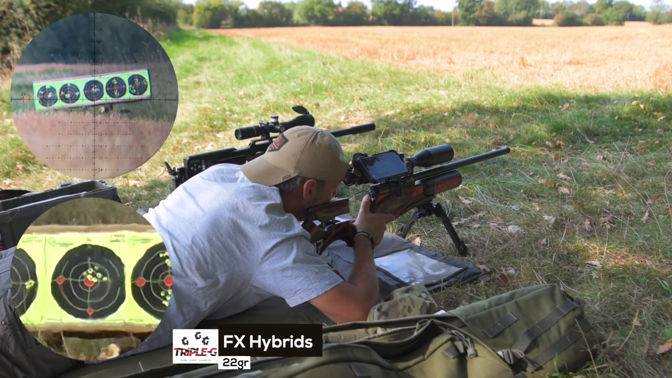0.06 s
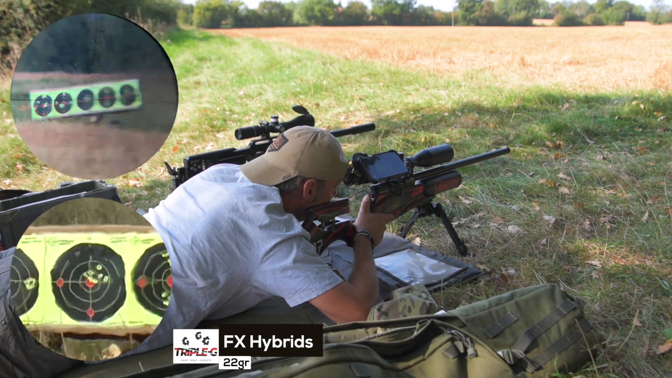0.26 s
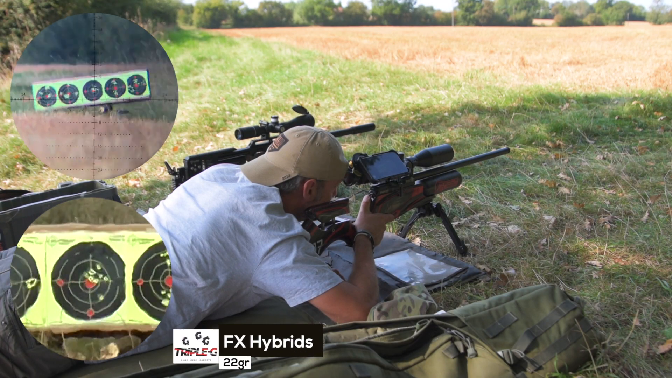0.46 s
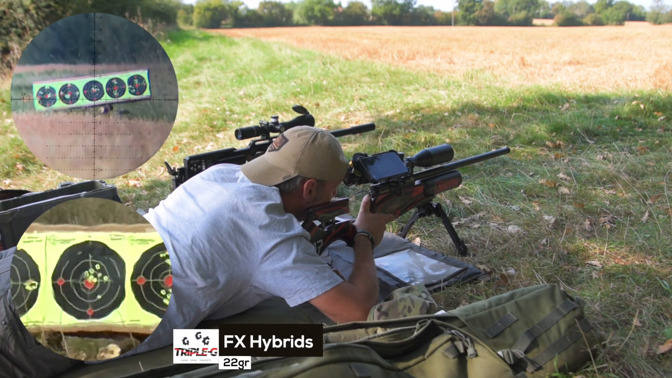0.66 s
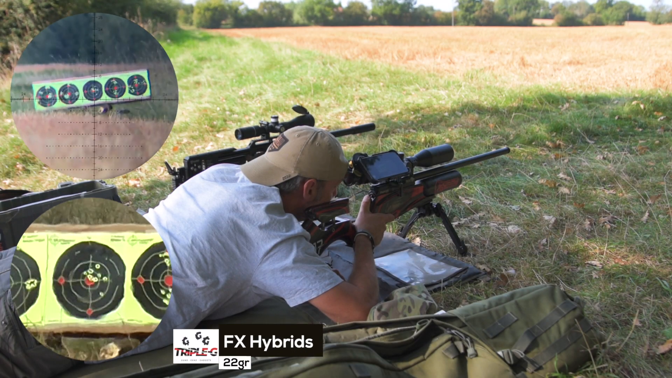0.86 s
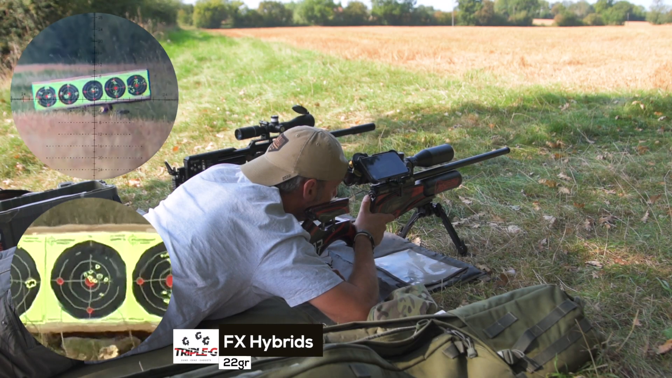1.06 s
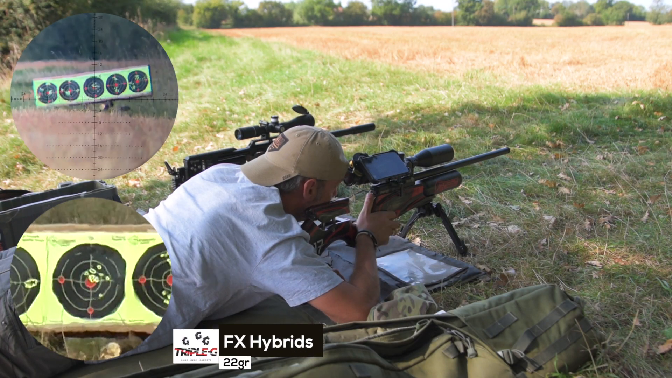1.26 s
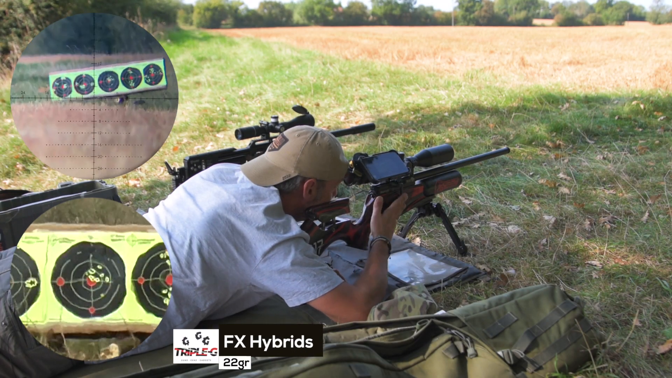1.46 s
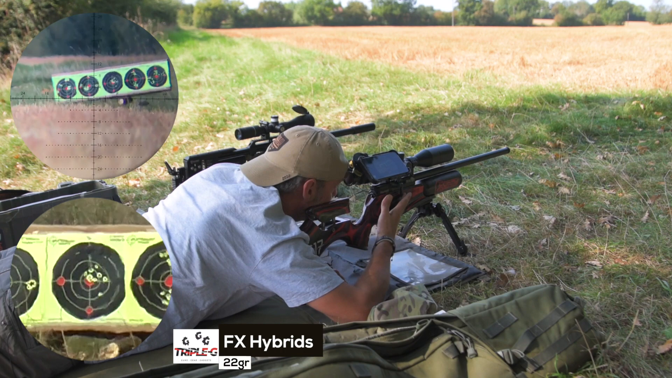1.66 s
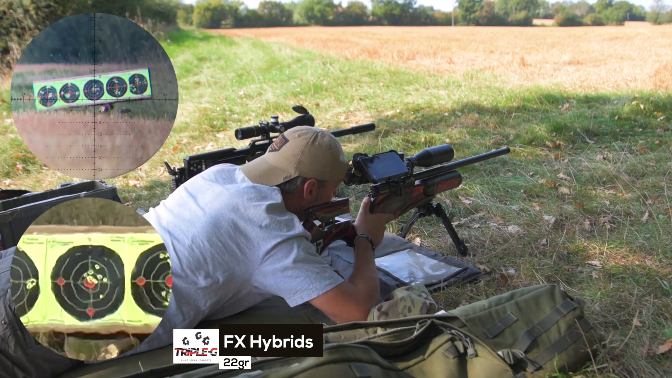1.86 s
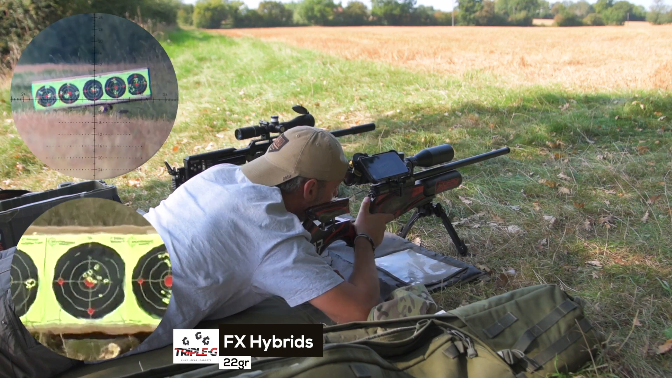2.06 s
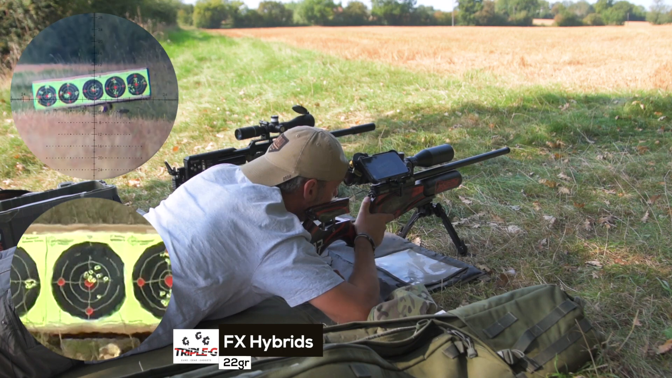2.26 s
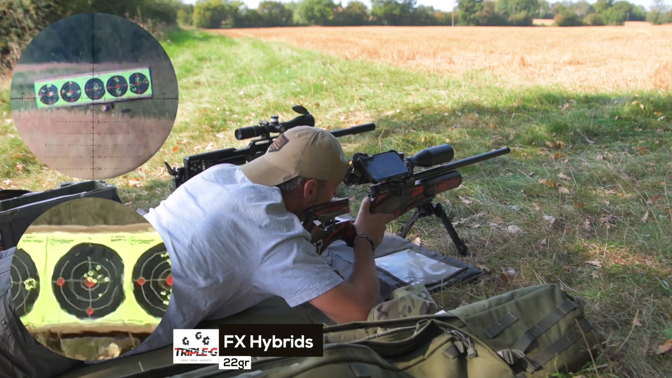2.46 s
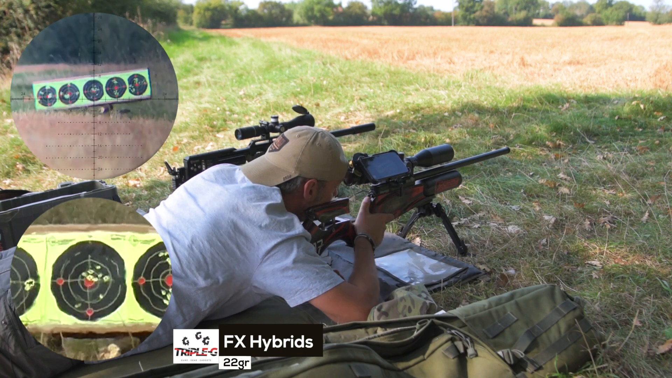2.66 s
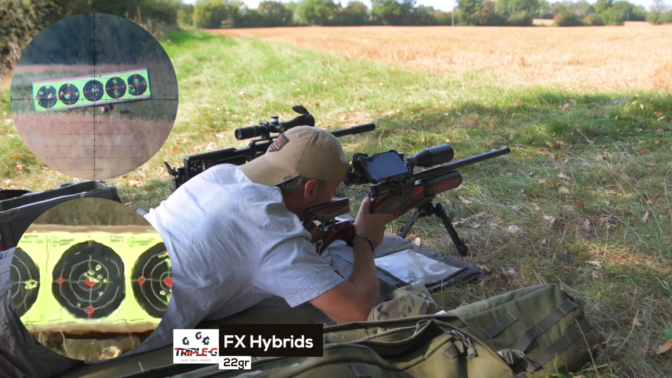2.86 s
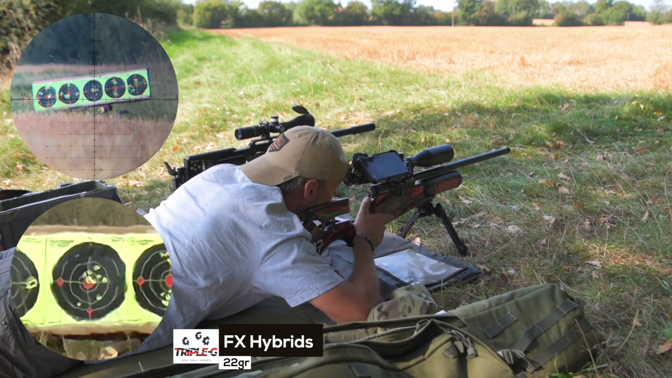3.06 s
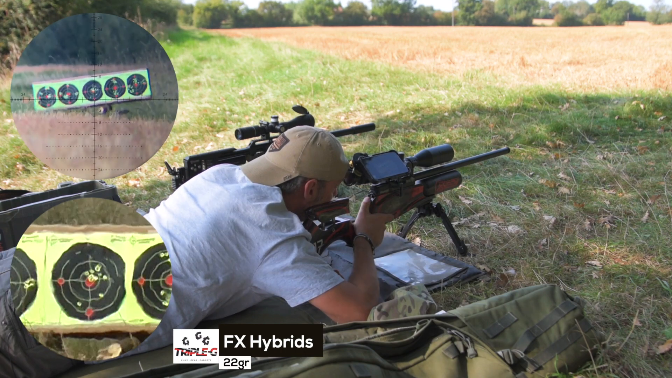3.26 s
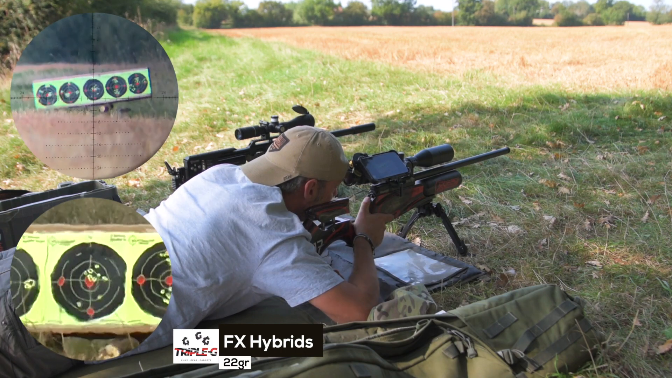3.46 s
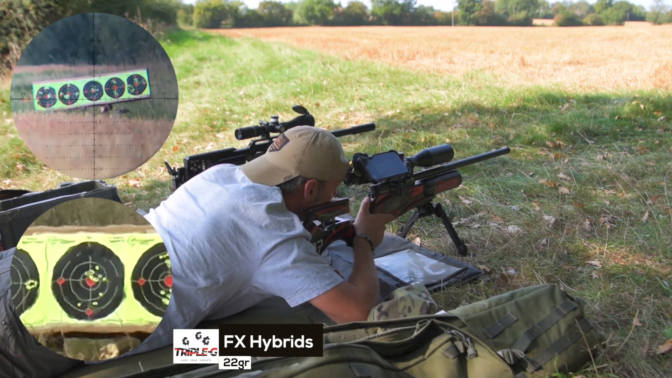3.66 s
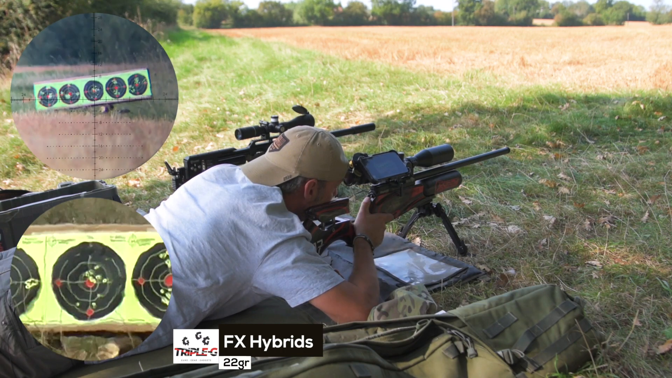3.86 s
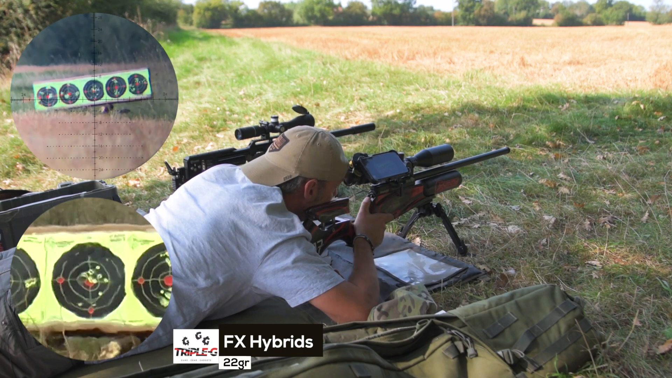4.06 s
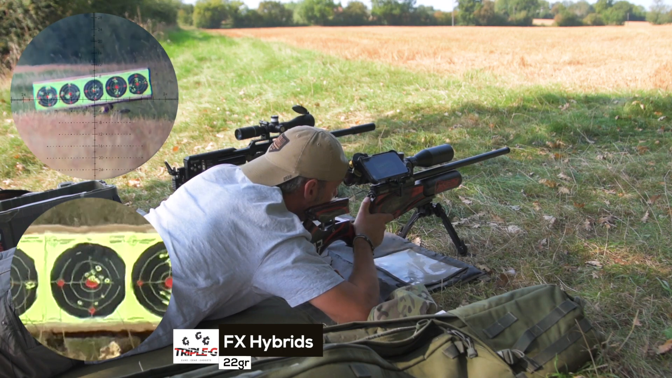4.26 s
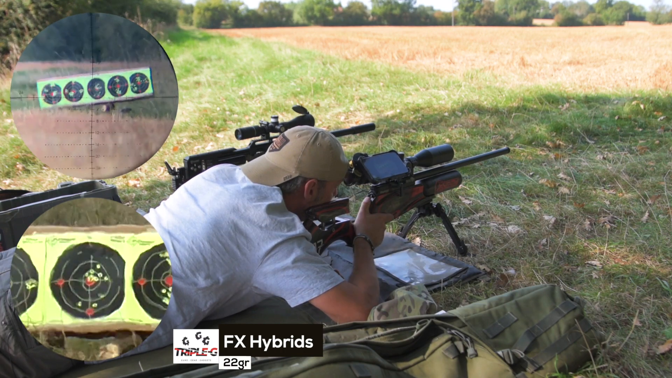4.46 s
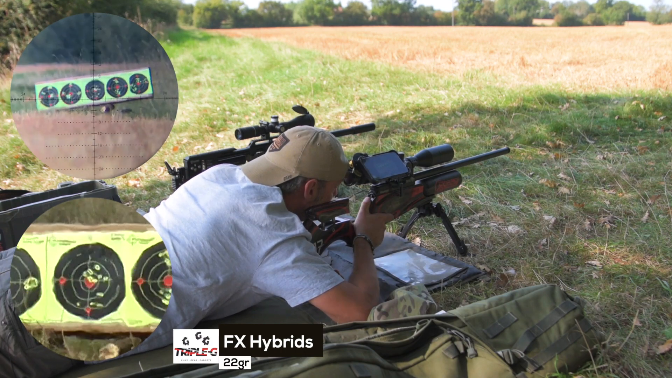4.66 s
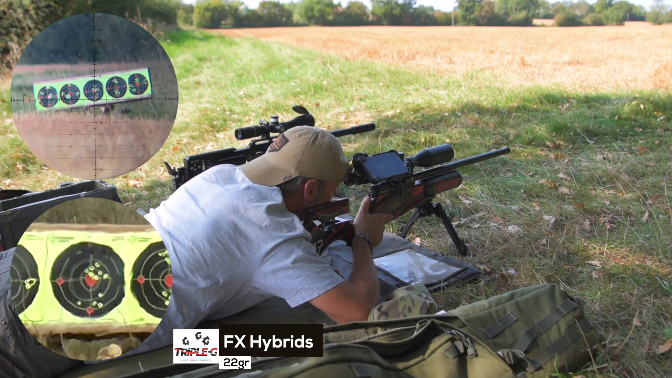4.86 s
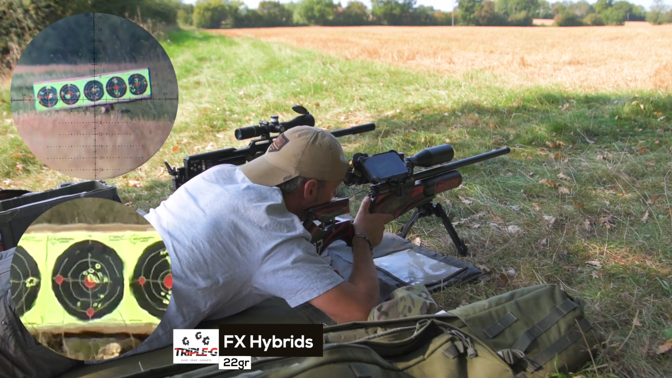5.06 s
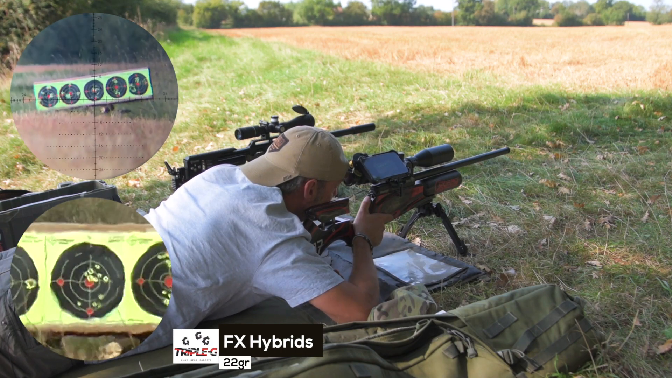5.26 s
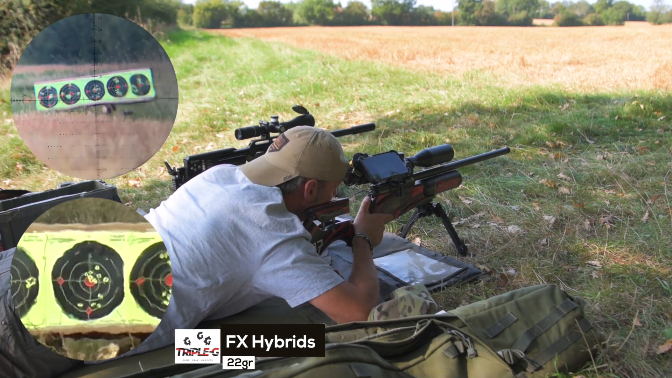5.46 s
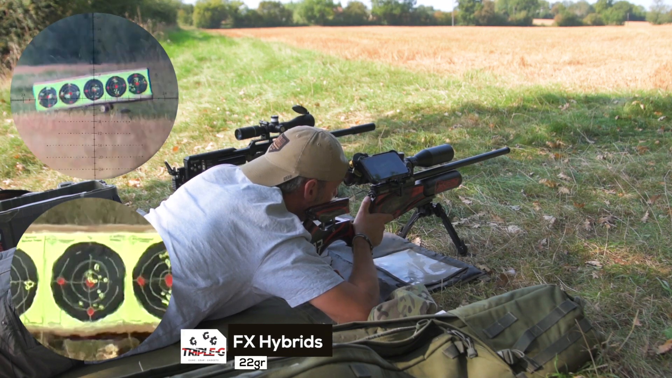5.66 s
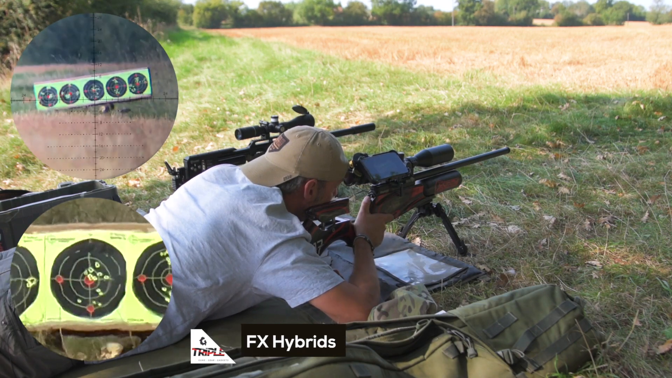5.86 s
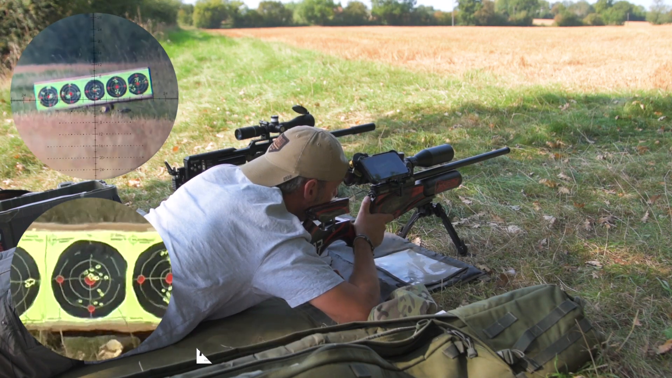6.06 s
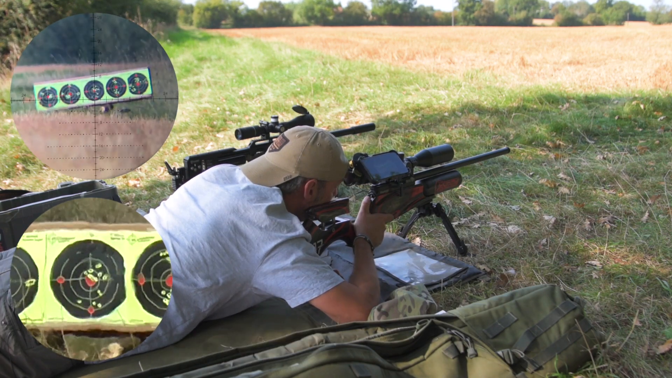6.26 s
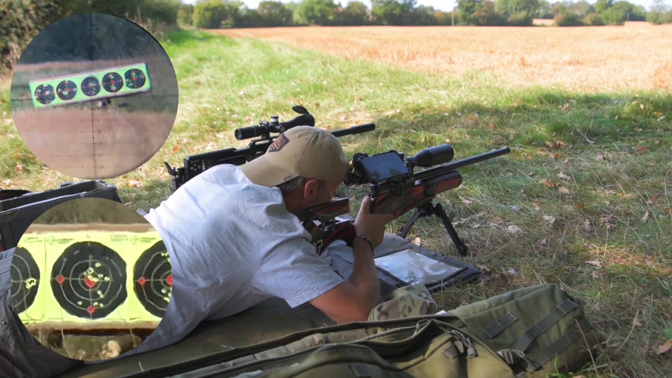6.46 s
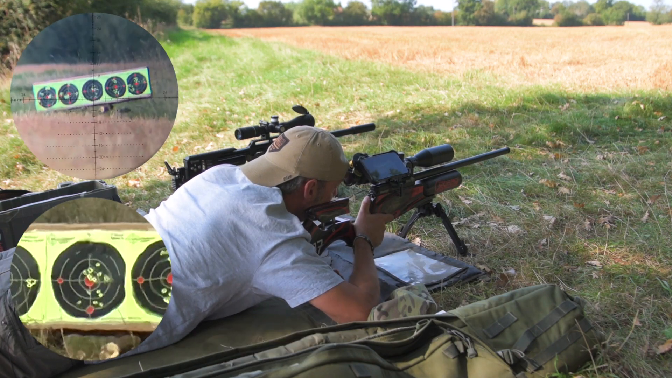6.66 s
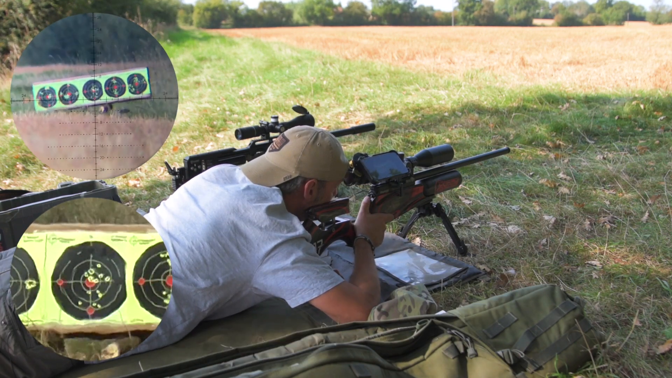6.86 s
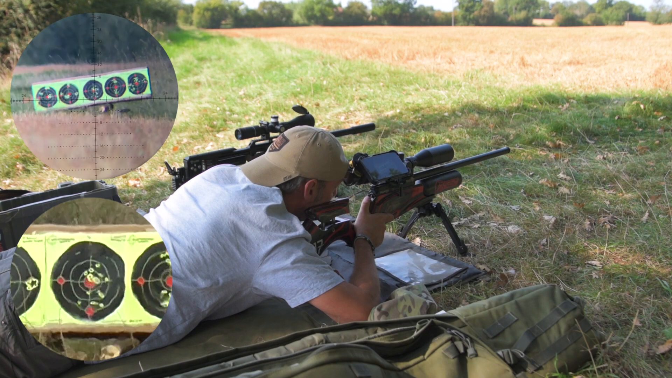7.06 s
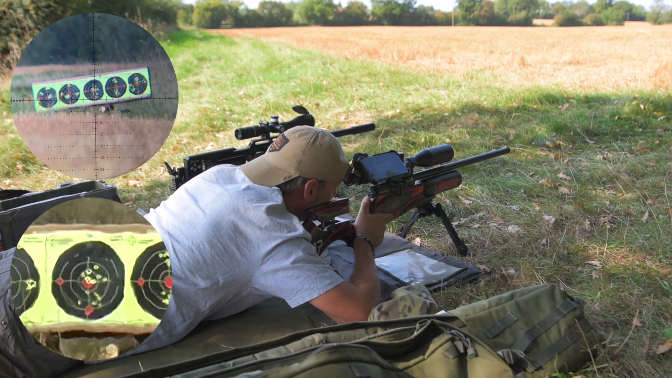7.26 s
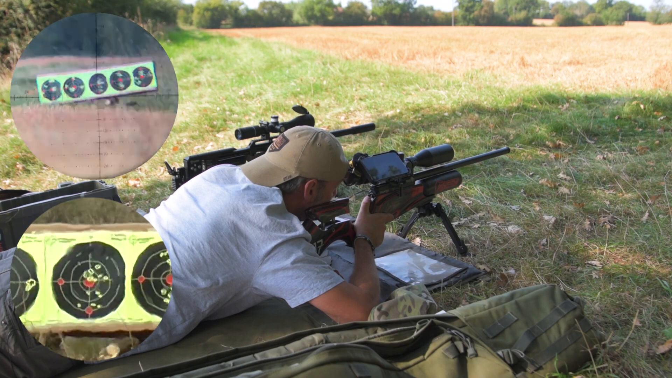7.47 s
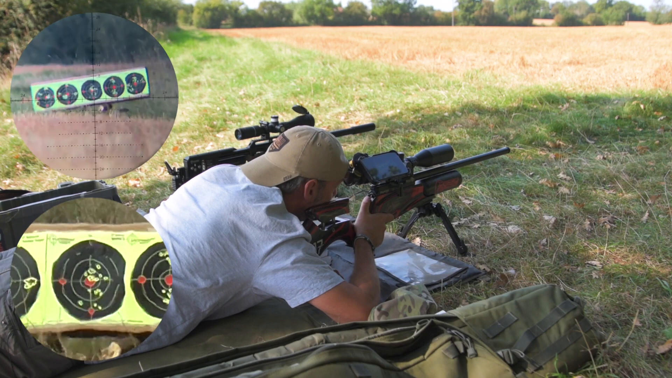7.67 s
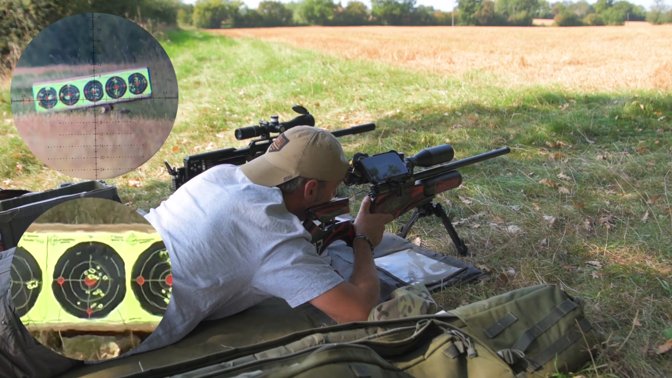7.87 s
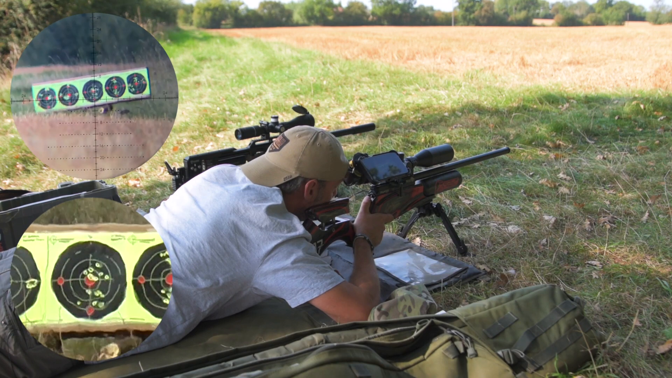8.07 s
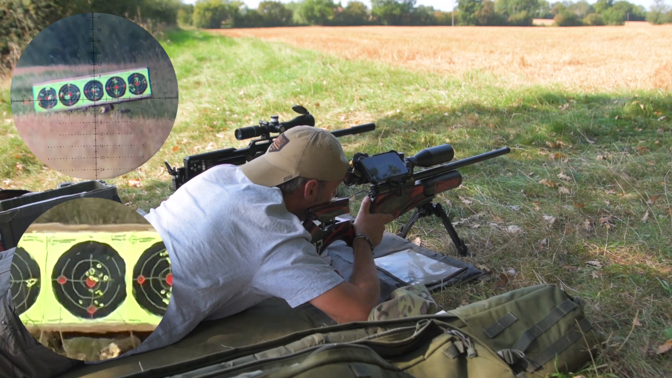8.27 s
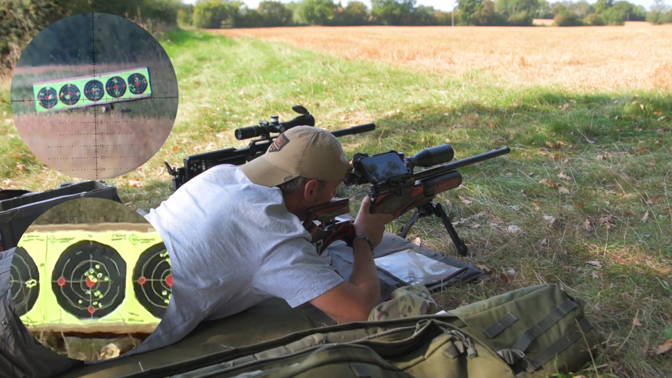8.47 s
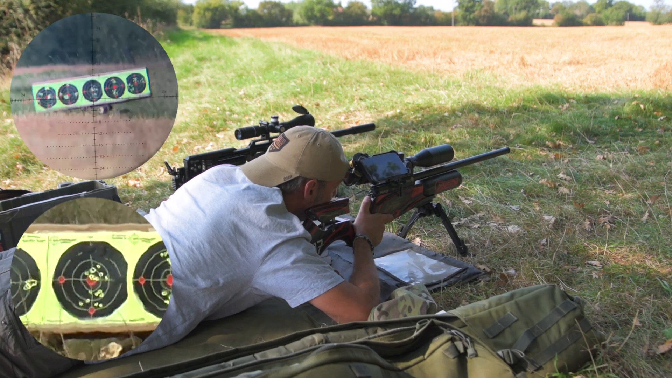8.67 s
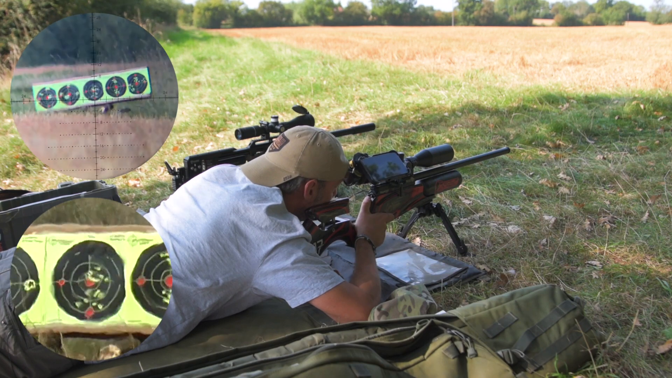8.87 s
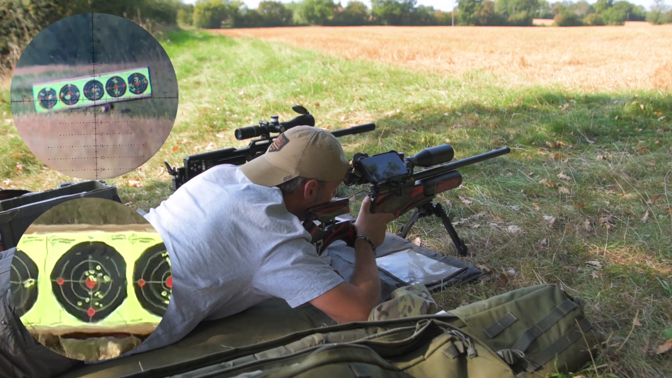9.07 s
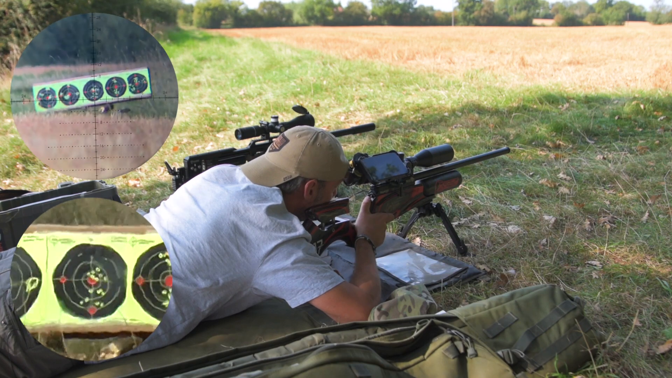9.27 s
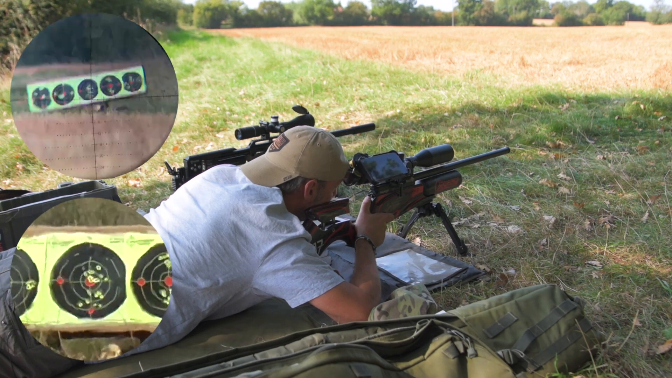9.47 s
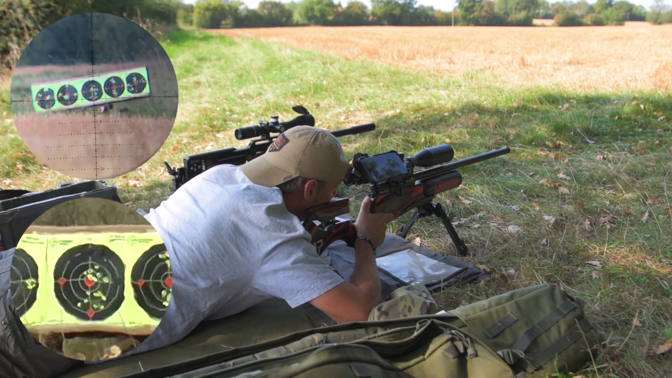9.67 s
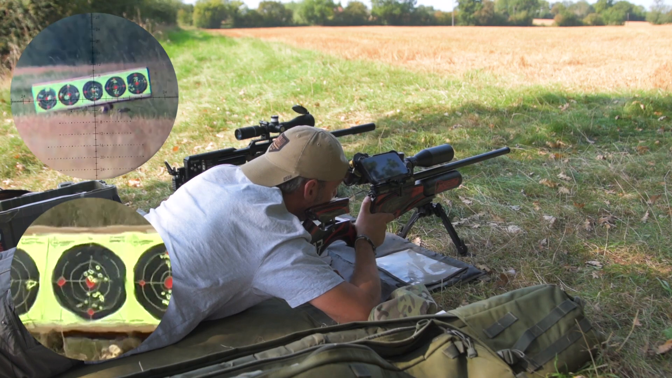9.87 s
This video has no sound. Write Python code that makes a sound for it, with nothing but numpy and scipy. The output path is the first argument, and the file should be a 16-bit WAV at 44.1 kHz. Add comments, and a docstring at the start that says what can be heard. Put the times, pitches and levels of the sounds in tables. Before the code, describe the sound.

A compressed-air rifle fires nine times about a second apart outdoors, snappy bursts of air followed by short echoes and a thin bottle ring.

```python
"""A quiet field with hedges and trees: a compressed-air rifle fires nine shots close to the microphone.
Hammer and valve ring the modes of the action; the air jet is shaped hiss, a rising whistle and fizz.
Delayed knocks and decaying noise return from trees and hedge, and the air bottle rings as sines until
each shot is cut off. Rumble, hum, hiss and handling lie beneath; the loudest peaks are clipped flat."""
import sys
import numpy as np
from scipy import signal
from scipy.fft import rfft, irfft
from scipy.io import wavfile
from scipy.ndimage import uniform_filter1d

SR = 44100
rng = np.random.default_rng(int(sys.argv[2]) if len(sys.argv) > 2 else 0)


def to_wav(sig):
    """Store sig (one row per channel, or 1-D mono) as 16-bit WAV at the path in sys.argv[1].

    Samples outside -1..1 are clipped; the rate is SR.
    """
    pcm = np.clip(np.atleast_2d(sig), -1, 1) * 32767
    pcm = np.round(pcm).astype(np.int16)
    wavfile.write(sys.argv[1], SR, pcm.T)  # frames by channels


N = 437913
LEAD_S = .003  # each shot starts this long before the hammer lands


def amp(db):
    """Decibels to gain."""
    return 10 ** (np.asarray(db) / 20)


def evened(x):
    """Scales to rms 1."""
    return x / np.sqrt(np.mean(x ** 2) + 1e-20)


def add(mix, s, sound):
    """Mixes a sound in at a time in seconds, dropping what runs past the end."""
    part = mix[round(s * SR):][:len(sound)]
    part += sound[:len(part)]


def resonate(x, hz, width):
    """Shifts the curve hz down to zero, averages over 1 / width, and shifts back: a band of gain 1."""
    turn = np.exp(2j * np.pi * np.cumsum(hz * np.ones(len(x))) / SR)
    r = np.exp(-np.pi * width / SR)
    return 2 * (turn * signal.lfilter([1 - r], [1, -r], x / turn)).real


def narrow_band(x, hz, width):
    """Two equal resonances in a row, scaled to rms 1."""
    return evened(resonate(resonate(x, hz, width), hz, width))


def noise(size, level_db):
    """Random short-time spectra; level_db(hz, t) gives the magnitude."""
    hz = np.fft.rfftfreq(256, 1 / SR)[:, None]
    t = np.arange(size // 64 + 5) * 64 / SR
    real, imag = rng.standard_normal((len(t), 129, 2)).T
    spectra = (real + 1j * imag) * amp(level_db(hz, t)) / 16
    return signal.istft(spectra, nperseg=256, noverlap=192)[1][:size]


def on_log(points, hz, column=1):
    """Reads a table column on a log-frequency axis."""
    points = np.transpose(points)
    return np.interp(np.log(hz + 1), np.log(points[0] + 1), points[column])


def puff(ms, at_ms, peak_db, rise, fall):
    """A gain that climbs to its peak and falls away, straight in dB; slopes in dB per ms."""
    return amp(peak_db - rise * np.maximum(at_ms - ms, 0) - fall * np.maximum(ms - at_ms, 0))


def unsteady_tone(hz, width, flicker_db):
    """A tone whose pitch wavers on the scale of width and whose level flickers."""
    wander, flicker = (evened(uniform_filter1d(v, 30)) for v in rng.standard_normal((2, len(hz))))
    phase = 2 * np.pi * np.cumsum(hz + .5 * width * wander) / SR
    return amp(flicker_db * flicker) * np.sqrt(2) * np.sin(phase)


# colour of the wash over the open field: f/Hz, relative level/dB
WASH_COLOUR = [(12, -33.5), (20, -4), (70, -1.5), (334, -10), (394, -10.5), (582, -15), (728, -16.5),
               (3100, -21.5), (14300, -23), (15600, -23)]
WASH_DB = -66.5


def wash():
    """Steady noise from the open field, weighted towards the bass."""
    colour = amp(on_log(WASH_COLOUR, np.fft.rfftfreq(N, 1 / SR)))
    return amp(WASH_DB) * evened(irfft(rfft(rng.standard_normal(N)) * colour, N))


# distant traffic or wind, rising and sinking: t/s, level/dB
RUMBLE_LEVEL = [(0.0, -68), (0.55, -77), (1.52, -63.5), (1.91, -77.5), (2.21, -69.5), (2.65, -79.5),
                (3.29, -68.5), (3.68, -77), (4.42, -69), (4.78, -77.5), (5.56, -73.5), (5.83, -77.5),
                (6.22, -70), (7.11, -74), (7.33, -68), (7.88, -74), (8.33, -66.5), (9.93, -70.5)]


def rumble():
    """Low band noise whose level follows a slow, lumpy curve."""
    level_db = np.interp(np.arange(N) / SR, *np.transpose(RUMBLE_LEVEL))
    return amp(level_db) * narrow_band(rng.standard_normal(N), 77, 45)


# spells of a low hum: start t/s, end t/s, level/dB
HUM_SPELLS = [(.05, .68, -70.5), (1.408, 1.75, -68.5)]
HUM_FADE_DB_PER_S = 68.5


def hum():
    """Narrow band noise that fades in before each spell and out after it."""
    t = np.arange(N) / SR
    level = 0
    for start, end, db in HUM_SPELLS:
        outside_s = np.maximum(np.maximum(start - t, t - end), 0)
        level = level + amp(db - HUM_FADE_DB_PER_S * outside_s)
    return level * narrow_band(rng.standard_normal(N), 167, 20)


# the shooter shifts and handles the rifle:
# t/s, level before the swell/dB, f/Hz, width of each filter pass/Hz, length/s
RUSTLES = [(0.775, -70.5, 4000, 500, 0.064), (0.767, -63.5, 5500, 5300, 0.023),
           (1.226, -61, 730, 660, 0.02), (1.223, -60.5, 4600, 2500, 0.011), (1.224, -64, 2110, 600, 0.026),
           (1.4, -57.5, 1260, 900, 0.0124), (1.272, -64.5, 1600, 1100, 0.063), (1.47, -77, 1400, 500, 0.39),
           (1.659, -69, 1195, 1204, 0.021), (1.713, -72, 1200, 1300, 0.063)]


def handling():
    """Cloth and fingers: short grainy noises in one band each, swelling and dying away."""
    out = np.zeros(N)
    for s, db, hz, width, length in RUSTLES:
        u = np.linspace(0, 1, round(length * SR))
        grain_db = 3.5 * np.minimum(rng.exponential(1, len(u)), 4)
        grains = rng.standard_normal(len(u)) * amp(grain_db)
        add(out, s, amp(db) * narrow_band(grains, hz, width) * 3 * np.sqrt(u) * (1 - u))
    return out


# finger on the stock: t/s, relative level/dB, f rung best/Hz, loss an octave away/dB, rise/s, longest t60/s
TAPS = [(1.4922, -32, 1150, 26, 0.0006, 0.027), (1.493, -28.5, 330, 15.5, 0.00048, 0.029)]


def finger_taps():
    """A finger taps the stock, ringing modes that the hand damps."""
    out = np.zeros(N)
    for s, *blow in TAPS:
        add(out, s, knock(*blow))
    return out


# kinds of far trunk: relative level/dB, f returned best/Hz, loss an octave away/dB
TRUNKS = [(-3, 1100, 15), (-1, 1600, 15), (-4.5, 1600, 12), (-13.5, 3350, 14.5), (-13.5, 8300, 12),
          (-14, 8700, 10)]


def trees(size, best_hz, second_hz):
    """Each far trunk returns a blurred copy of a knock; a few are stronger, and two bands carry best."""
    t = np.arange(size) / SR
    chance, side, strength = rng.random((size, len(TRUNKS) + 2, 3)).T
    present = chance < 600 / SR  # about 600 returns a second of each kind
    returns = present * np.sign(side - .5) * amp(3 * np.minimum(-np.log(1 - strength), 4))
    echoes = 0
    for train, (db, hz, falloff_db) in zip(returns, TRUNKS):
        copy = evened(knock(0, hz, falloff_db, .001, 0.035, spread_db=3.5))
        echoes = echoes + amp(db) * signal.oaconvolve(train, copy)[:size]
    bands = amp(-3.5) * narrow_band(returns[-1], best_hz, 190)
    bands += amp(-6.5) * narrow_band(returns[-2], second_hz, 190)
    decay = amp(-60 * t / .55) + amp(-19.0 - 60 * t / 3.3)  # quick, then lingering
    return evened(evened(echoes) + bands) * decay


# scatter from the hedge, before each shot's own gain:
# f/Hz, early level/dB, early t60/s, late level/dB, late t60/s
HEDGE_SCATTER = [(100, -45.5, 0.17, -62.5, .5), (400, -46, 0.73, -62.5, .5), (696, -48, 0.4, -57, 0.73),
                 (1200, -46.5, 0.49, -52.5, .6), (2200, -41.5, 0.17, -50.5, 0.42),
                 (2800, -43.5, .2, -52, 0.9), (4370, -41.5, 0.17, -44.5, .55),
                 (8000, -36.5, 0.13, -42.5, .45), (10900, -41, 0.083, -49, .4),
                 (15400, -44.5, .14, -55.5, 0.39), (15800, -76.5, .15, -85, .3)]


def hedge(size):
    """The bang swells back from the nearest leaves in lumps, each band dying at its own two rates."""
    def level_db(hz, t):
        first_db, first_t60, later_db, later_t60 = (on_log(HEDGE_SCATTER, hz, column=k) for k in (1, 2, 3, 4))
        both = amp(first_db - 60 * t / first_t60) + amp(later_db - 60 * t / later_t60)
        lumps = rng.standard_normal((len(t), len(hz))).T
        lumps = evened(uniform_filter1d(uniform_filter1d(lumps, 7, 0), 5, 1))
        # each bang has its own colour
        bands = evened(uniform_filter1d(rng.standard_normal(hz.shape), size=3, axis=0))
        # clumps of leaves make the whole level flutter
        flutter = evened(uniform_filter1d(rng.standard_normal(len(t)), size=6))
        return 20 * np.log10(both) + 1.6 * lumps + 2.4 * bands + 1.5 * flutter
    t = np.arange(size) / SR
    return noise(size, level_db) * (1 - np.exp(-(t / 0.0087) ** 2))


def echo(db, best_hz):
    """A knock that has travelled: blunt, short, stripped of bass and treble."""
    return resonate(knock(db, best_hz, 9.9, .001, hold_t60=0.079, spread_db=2.0), best_hz, 700)


# echoes after every shot, in the colour of the trees: t after the hammer lands/s, level before filtering/dB
SLAPS = [(.047, -37.5), (.0735, -32), (.132, -33.5), (0.157, -39), (0.311, -51.5)]


def single_echoes(size, trees_hz, far_db):
    """Separate reflections, among them a strong low one and a late one that varies from shot to shot."""
    out = np.zeros(size)
    for after, db in SLAPS + [(.248, far_db)]:
        add(out, LEAD_S + after, echo(db, trees_hz))
    add(out, LEAD_S + .0728, echo(-22.5, 1082))
    return out


# modes of the air bottle, before each shot's own gain: f/Hz, level/dB, t60/s
BOTTLE_MODES = [(888.4, -51.5, 1.8), (1170, -67, 0.95), (1450, -64, 0.23), (1860, -65, .5),
                (2270, -64, 0.59), (3390, -66, .4)]


def bottle(size, bottle_db):
    """The air bottle keeps ringing: soft-starting sines with random phase, each fading at its own rate."""
    t = np.arange(size) / SR
    out = np.zeros(size)
    for hz, db, t60 in BOTTLE_MODES:
        tone = np.sin(2 * np.pi * (hz * t + rng.random()))
        out += amp(db + bottle_db - 60 * t / t60) * tone * (1 - np.exp(-t / 0.022))
    return out


def low_push(size, push_db, push_hz):
    """Recoil and displaced air: a thump that falls from 1.24 to 0.6 times push_hz."""
    t = np.arange(size) / SR
    cycles = np.cumsum(push_hz * (.6 + 0.64 * np.exp(-t / 0.032))) / SR
    swell = (t / 0.014 * np.exp(1 - t / 0.011)) ** 5.7
    return amp(push_db) * swell * np.sin(2 * np.pi * cycles)


# moments of the air jet, ms after the hammer lands
STRIKE_MS, OPEN_MS, EMPTY_MS, SHUT_MS = 0.14, 3.8, 11.1, 20.8
# colour of the escaping air: f/Hz, relative level/dB
HISS_COLOUR = [(150, -32.5), (400, -7), (1200, -9), (3500, -14), (7200, -10.5), (11000, -13), (15300, -16),
               (16000, -31.5)]
# relative peak/dB, rise/dB per ms, fall/dB per ms: at the strike, from the open valve, after it shuts
CRACK, BLAST, SIGH = (-6.5, 30, 9), (-11, 5, 0.98), (-44.5, 3, 0.14)


def hiss(ms):
    """Turbulent air: coloured noise in a crack, a blast that the shutting valve cuts short, and a sigh."""
    gain = puff(ms, STRIKE_MS, *CRACK) + puff(ms, SHUT_MS, *SIGH)
    gain += puff(ms, OPEN_MS, *BLAST) * puff(ms, SHUT_MS, 0, 0, 2)
    return gain * evened(noise(len(ms), lambda f, t: on_log(HISS_COLOUR, f) + 0 * t))


WHISTLE_HZ, SLIDE_HZ_PER_MS, SLIDE_FROM_MS = (3445, 15640), 1211, 1.8
WHISTLE_DB, WHISTLE_SWELL_DB, WHISTLE_SWELL_MS, WHISTLE_STOP_DB_PER_MS = -3, 40, 3.8, 15.5


def whistle(ms):
    """A muzzle whistle that swells and slides up as the barrel empties, then stops."""
    hz = np.clip(WHISTLE_HZ[0] + SLIDE_HZ_PER_MS * (ms - SLIDE_FROM_MS), *WHISTLE_HZ)
    gain = amp(WHISTLE_DB - WHISTLE_SWELL_DB * np.exp(-ms / WHISTLE_SWELL_MS))
    gain *= puff(ms, EMPTY_MS, 0, 0, WHISTLE_STOP_DB_PER_MS)
    return gain * unsteady_tone(hz, 900 + .35 * (WHISTLE_HZ[1] - hz), 2.8)  # rough while low


# relative peak/dB, rise/dB per ms, fall/dB per ms
FIZZ_STRIKE, FIZZ_BLAST = (-23.5, 50, .4), (-9, 5.1, 0.32)
FIZZ_RING, FIZZ_TAIL = (-19, 8, 1), (-44, 9, .95)
FIZZ_LAG_MS, FIZZ_STOP_DB_PER_MS = 1.3, 9
# pitch at strike, emptied; width at strike, emptying, ringing
FIZZ_HZ, FIZZ_WIDTH_HZ = (12900, 14510), (3000, 1600, 300)


def fizz(ms):
    """A high, rough fizz that narrows to a clear ring when the barrel is empty."""
    blowing = puff(ms, STRIKE_MS, *FIZZ_STRIKE) + puff(ms, OPEN_MS + FIZZ_LAG_MS, *FIZZ_BLAST)
    blowing *= puff(ms, EMPTY_MS, 0, 0, FIZZ_STOP_DB_PER_MS)
    ringing = puff(ms, EMPTY_MS + FIZZ_LAG_MS, *FIZZ_RING) * puff(ms, SHUT_MS, 0, 0, FIZZ_STOP_DB_PER_MS)
    tail = puff(ms, SHUT_MS + FIZZ_LAG_MS, *FIZZ_TAIL)
    hz = np.interp(ms, [STRIKE_MS, EMPTY_MS], FIZZ_HZ)
    width = np.interp(ms, [STRIKE_MS, EMPTY_MS, EMPTY_MS + FIZZ_LAG_MS], FIZZ_WIDTH_HZ)
    return (blowing + ringing + tail) * unsteady_tone(hz, width, 3.5)


def jet(hiss_db, whistle_db):
    """Air from the muzzle: hiss, whistle and fizz, almost sealed in until the hammer lands."""
    ms = np.arange(-LEAD_S, .05, 1 / SR) * 1000
    air = amp(hiss_db) * hiss(ms) + amp(whistle_db) * (whistle(ms) + fizz(ms))
    return air * puff(ms, 0, 0, 30, 0)


# modes of action and stock: f/Hz, relative level/dB, t60 before further damping/s
ACTION_MODES = [(159, -8, 0.3), (220, -12, 0.035), (385, -11, 0.031), (494, -2.5, 0.029), (668, -1, 0.03),
                (817, -8, 0.024), (1117, -4, 0.047), (1205, -7.5, .04), (1448, -3, 0.035),
                (1610, -3.5, 0.02), (1883, -1.5, 0.021), (2027, -4.5, 0.039), (2237, -2.5, 0.033),
                (2160, -8, 0.012), (2730, -10, 0.026), (3264, -7, 0.02), (3580, 1.5, 0.018),
                (4060, -4.5, 0.022), (4630, -3.5, 0.037), (5940, -1, 0.017), (6870, -3.5, .02),
                (9430, -6.5, 0.038), (10150, -6.5, 0.0052), (12800, -8, 0.0086)]


def knock(db, best_hz, falloff_db, rise, hold_t60=0.1, spread_db=4.0):
    """One blow rings all modes of the action, most those near best_hz, never twice quite alike."""
    hz, mode_db, t60 = np.transpose(ACTION_MODES)[:, :, None]
    t = np.arange(2200) / SR
    chance = rng.standard_normal((len(ACTION_MODES), 2, 1))
    level_db = mode_db - falloff_db * abs(np.log2(hz / best_hz)) + spread_db * chance[:, 0] - 60 * t / t60
    detuned_hz = hz * (1 + 0.01 * chance[:, 1])
    ring = (amp(level_db) * np.sin(2 * np.pi * detuned_hz * t)).sum(0)
    return amp(db - 60 * t / hold_t60) * ring * (1 - np.exp(-(t / rise) ** 2))


# blows in every shot, before each shot's own gain:
# t after the hammer lands/s, relative level/dB, f rung best/Hz, loss an octave away/dB, rise/s
BLOWS = [(-.003, -38, 699.8, 7, .001), (-.0021, -23, 901, 8.5, .0008), (-.0001, -13, 1707, 5, .00005),
         (.0006, -12.5, 2967, 3.5, 0.000088), (.003, -13, 2317, 3, .00005),
         (.0042, -15, 4686, 0.5, 0.00008), (.0062, -21, 1000, 7.5, .0003), (.0085, -18.5, 700, 4, .0004),
         (.013, -28.5, 997.2, 4, .0005), (.0203, -21, 4521, 3, .0002), (.0205, -15.5, 1383, 5.5, .0012),
         (0.03, -26, 200.1, 8.5, .003)]


def hammer_and_valve(size, action_db):
    """Hammer and valve strike the action in a quick run of knocks."""
    out = np.zeros(size)
    for after, db, *colour in BLOWS:
        add(out, LEAD_S + after, knock(db + action_db, *colour))
    return out


def shot(s, action_db, hiss_db, whistle_db, push_db, push_hz, hedge_db, trees_hz, second_hz, far_db,
         bottle_db, end_s):
    """Start time and sound of one shot with its returns, faded out over the last 2 ms."""
    size = round((end_s - s) * SR)
    out = single_echoes(size, trees_hz, far_db)
    scatter = amp(hedge_db) * hedge(size) + amp(-44.5) * trees(size, trees_hz, second_hz)
    add(out, .041, scatter)
    out += bottle(size, bottle_db) + low_push(size, push_db, push_hz)
    add(out, 0, jet(hiss_db, whistle_db))
    out += hammer_and_valve(size, action_db)
    t = np.arange(size) / SR
    return s - LEAD_S, out * np.minimum((t[-1] - t) / .002, 1)


# the nine shots, hammer at t/s; gains of action, air hiss, whistle with fizz, low push: level/dB each;
# push f/Hz; hedge gain level/dB; f the trees return best/Hz, second best f/Hz;
# far echo level before filtering/dB; bottle gain level/dB; t/s that with t sets the length
SHOTS = [(0.1827, 0, 2.5, 0.5, -15.5, 90.3, 13, 1789, 2340, -39, 0, 1.77),
         (2.2585, 1, 1.5, -1.5, -12, 90, 12, 1790, 1442, -32, 1, 2.835),
         (3.2536, 2, 2, 2, -11.5, 155, 13, 2188, 3286, -38.5, 3, 3.835),
         (4.3110, 0, 3, 2, -9, 130.8, 12.5, 1860, 2230, -38, 2.5, 4.903),
         (5.3920, -0.5, 2, 2, -9.5, 137.8, 13.5, 2202, 1179, -41.5, 2.5, 5.869),
         (6.3368, -0.5, 2.5, -1, -12.5, 80, 11, 2185, 1110, -42, 1.5, 6.904),
         (7.324, 0.5, 1, -1.5, -7.5, 72.5, 11, 1837, 1440, -42, 2, 7.905),
         (8.3827, 0.5, 1, 2, -6, 75, 11.5, 1860, 2310, -42, 3.5, 8.91),
         (9.3288, 1, 2, 2, -8, 112.4, 11.5, 2195, 1420, -47.5, 2, 9.99)]


def scene():
    """Shots and their echoes over the quiet field."""
    mix = wash() + rumble() + hum() + handling() + finger_taps()
    for row in SHOTS:
        add(mix, *shot(*row))
    return mix[None]


def record(dry):
    """The microphone drops the deepest bass, the loudest peaks are clipped flat, a low-pass trims the top."""
    bass_cut = signal.butter(3, 42, "high", fs=SR, output="sos")
    clipped = np.clip(signal.sosfilt(bass_cut, dry), -.95, .95)
    low_pass = signal.firwin(511, 16400, window=("kaiser", 9), fs=SR)
    return signal.oaconvolve(clipped, low_pass[None], "same")


dry = scene()
out = record(dry)
to_wav(out)
```